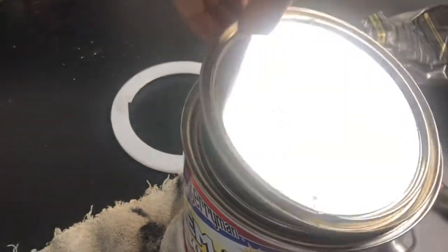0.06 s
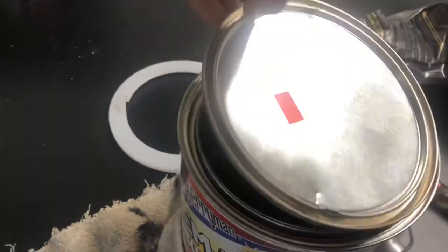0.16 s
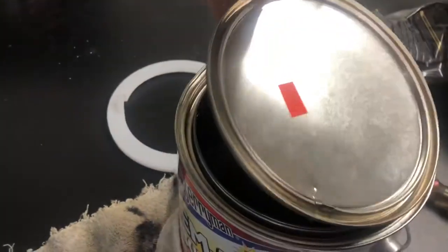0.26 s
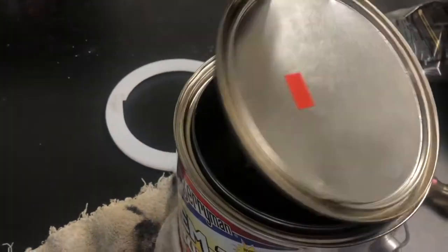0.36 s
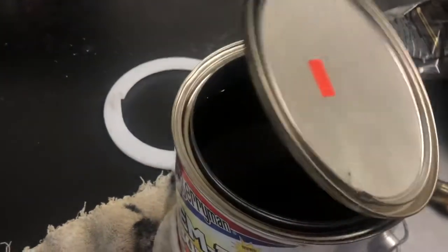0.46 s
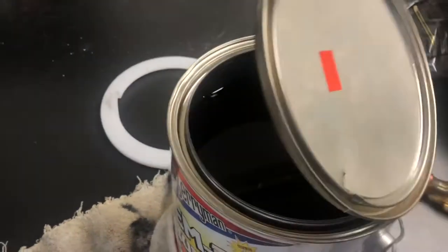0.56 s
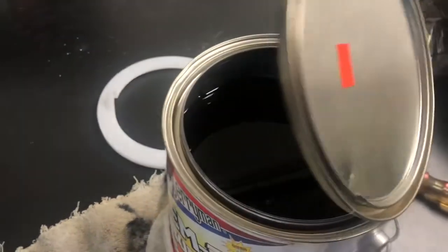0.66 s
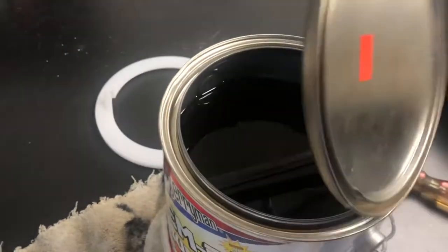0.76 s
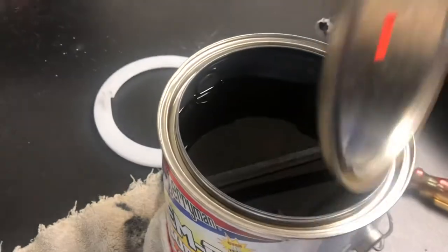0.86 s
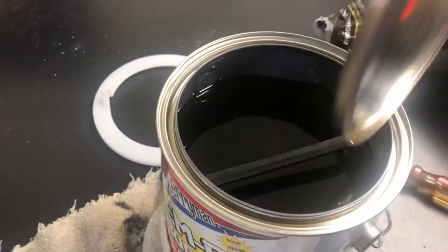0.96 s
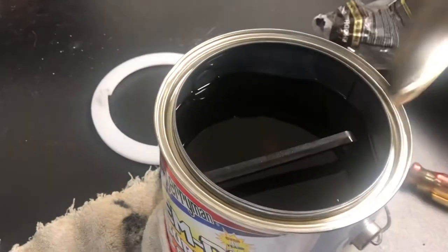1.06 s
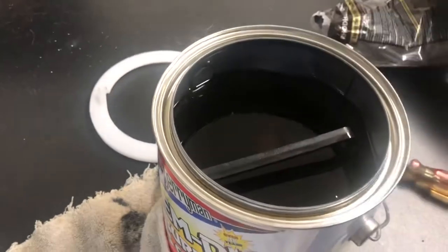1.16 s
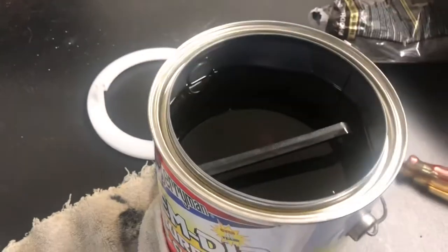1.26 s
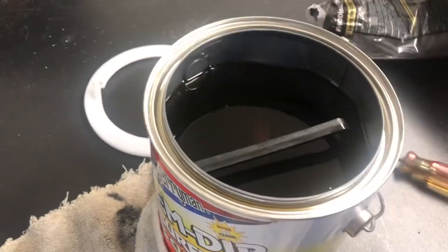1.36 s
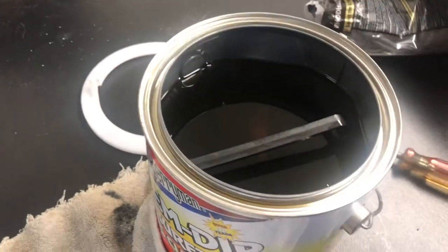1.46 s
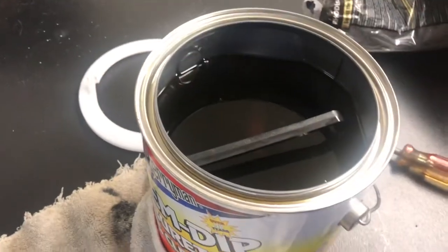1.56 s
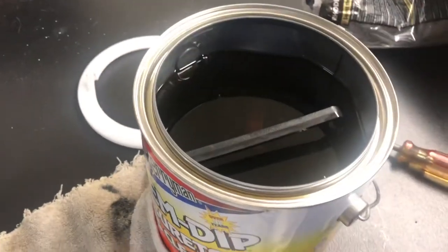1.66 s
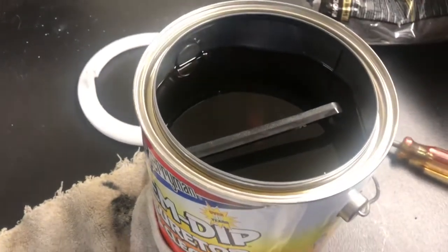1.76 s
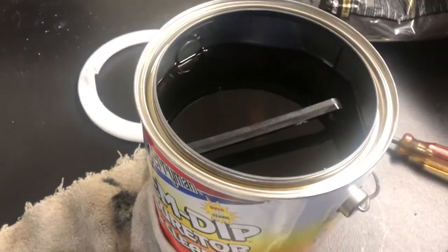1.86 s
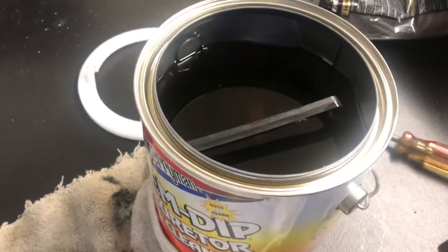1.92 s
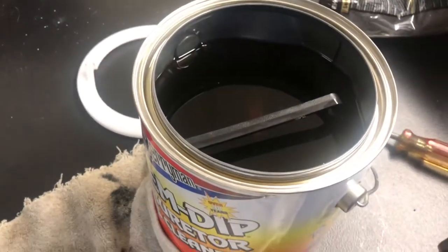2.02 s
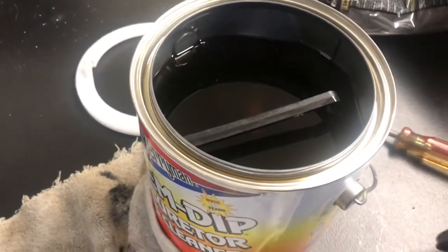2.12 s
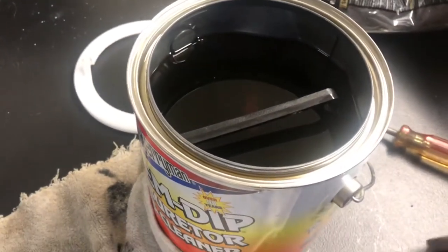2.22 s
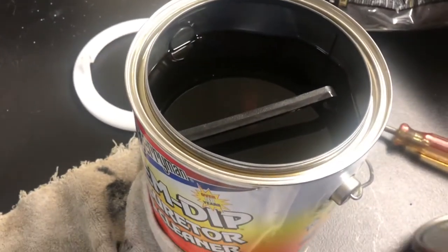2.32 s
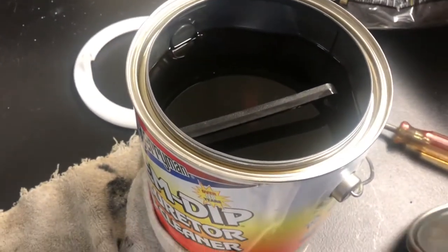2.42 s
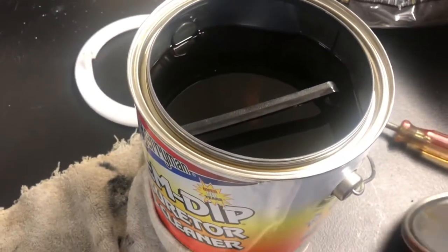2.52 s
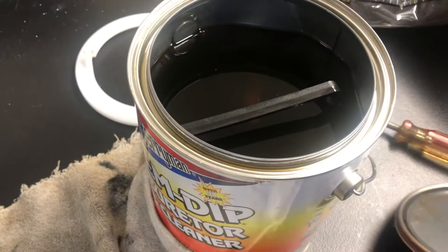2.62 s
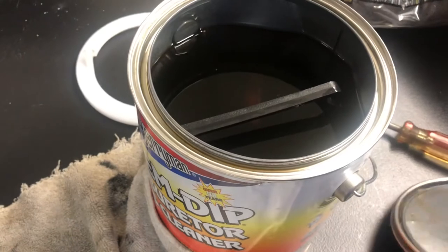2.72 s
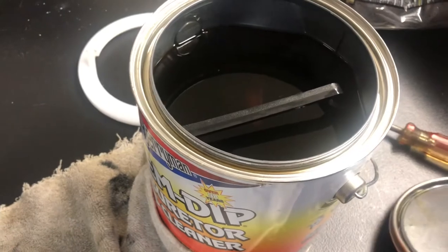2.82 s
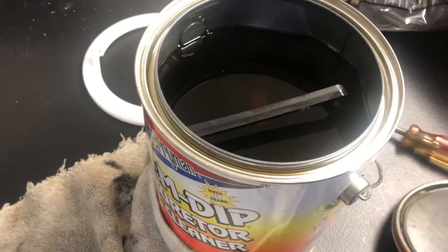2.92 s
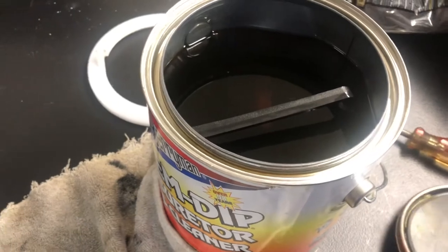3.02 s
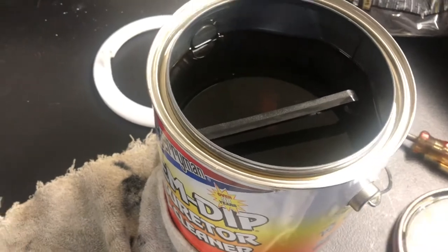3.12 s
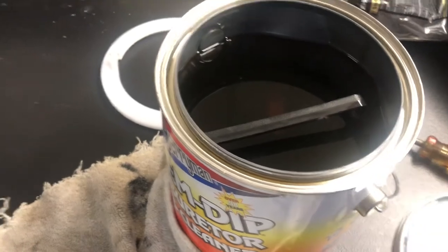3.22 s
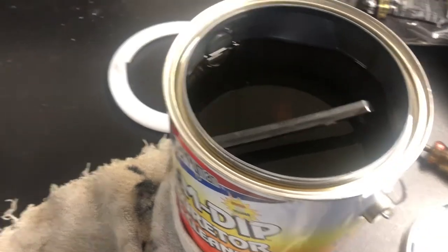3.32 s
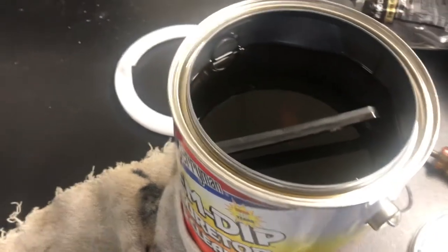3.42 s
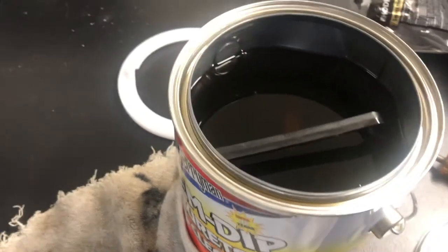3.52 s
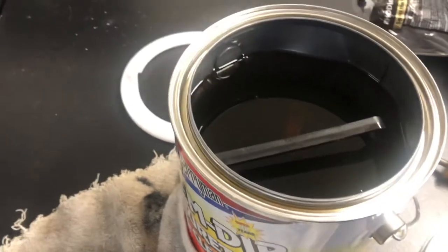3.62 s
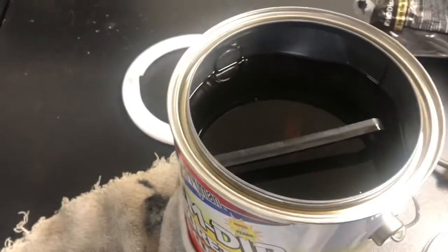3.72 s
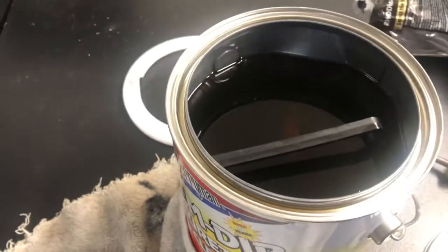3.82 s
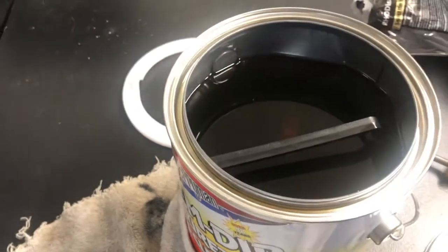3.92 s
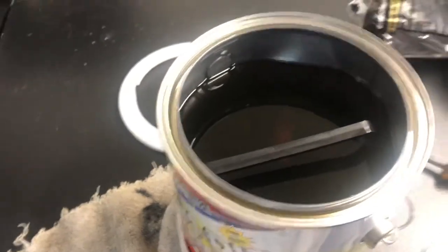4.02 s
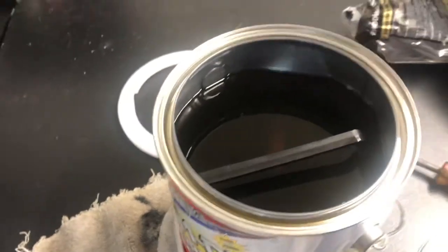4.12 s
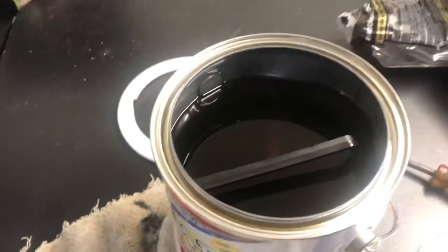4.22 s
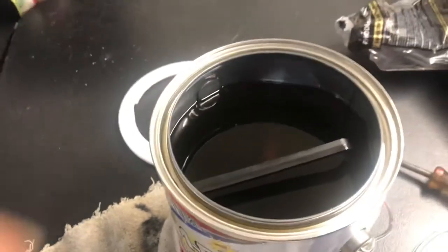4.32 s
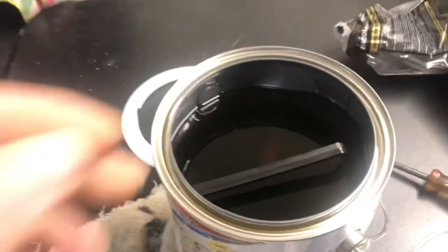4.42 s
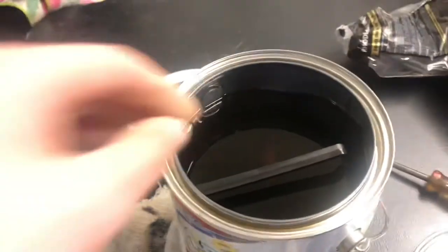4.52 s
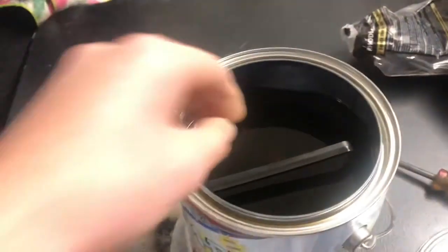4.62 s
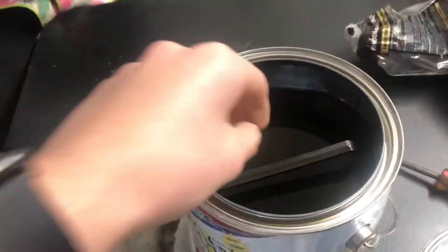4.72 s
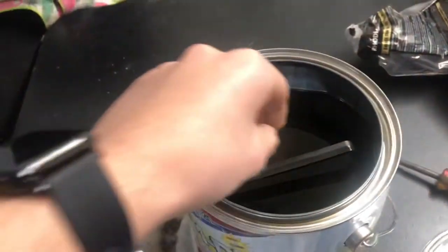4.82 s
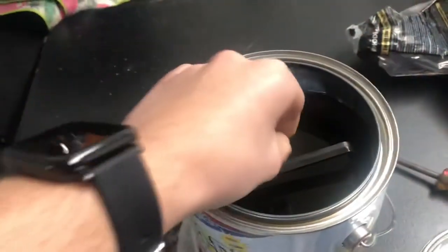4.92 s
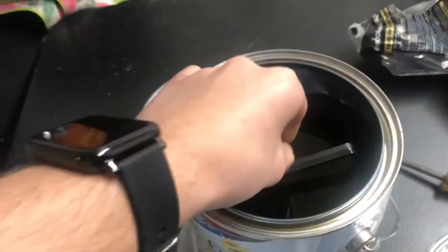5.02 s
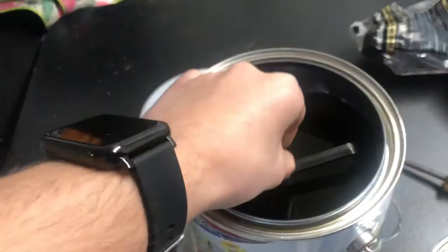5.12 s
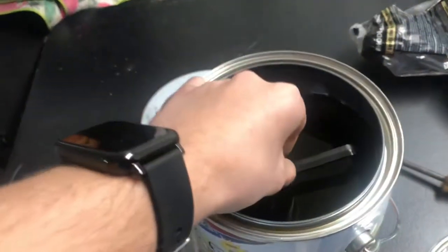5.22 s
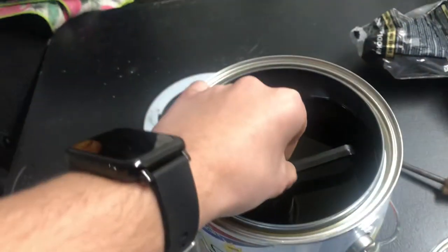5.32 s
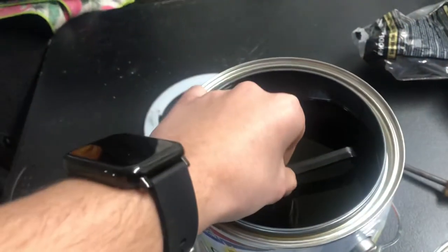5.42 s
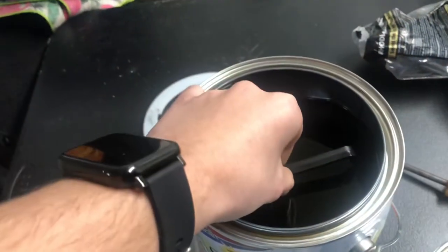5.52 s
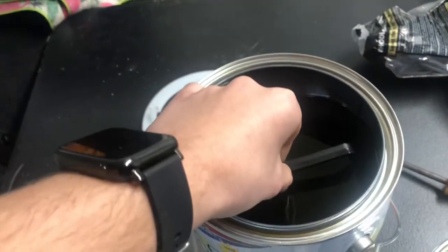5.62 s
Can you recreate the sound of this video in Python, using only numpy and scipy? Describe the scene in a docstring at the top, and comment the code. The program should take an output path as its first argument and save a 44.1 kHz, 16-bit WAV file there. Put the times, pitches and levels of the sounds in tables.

```python
"""First a faint scuff, then knocks, as a hand lifts the tin lid off a can in a quiet room.
The lid is set on a bench, slid along and let fall flat: blows and grit-like friction ring its decaying modes.
A few small taps follow through the bench top, as clicks with a downward-sweeping bending wave.
Last come a faint snap of noise clicks and soft pushes that hum in the bench.
One microphone takes it all in, over room hum and hiss made from banded noise."""
import sys
import numpy as np
from scipy import signal
from scipy.io import wavfile

SR = 44100
rng = np.random.default_rng(int(sys.argv[2]) if len(sys.argv) > 2 else 0)


def int16_out(signal):
    """Quantize to a 16-bit WAV file."""
    q = np.round(np.clip(np.atleast_2d(signal).T, -1, 1) * 32767)
    wavfile.write(sys.argv[1], SR, q.astype(np.int16))


N = 250047

# Room spectrum [f/Hz, level/dB per Hz]
ROOM_SPECTRUM = [(15, -53), (25, -24), (60, -2.5), (163, 0), (208, -3), (470, -11), (553, -15.5),
                 (726, -13.5), (787, -16), (1010, -18), (3060, -24.5), (15200, -31.5), (16500, -40.5)]
# Hum of the room, its low part, over time [t/s, level/dB]
ROOM_HUM = [(0, -61), (1.0, -67.5), (2.0, -69.5), (2.9, -65), (4.7, -70.5), (5.4, -66), (5.67, -69)]
# Soft pushes on the bench [t/s, length/s, level/dB]
NUDGES = [(5.04, 0.057, -71), (5.31, .14, -69), (5.533, 0.076, -74)]
# Faint snaps [t/s, level/dB]
SNAPS = [(5.249, -59.5), (5.255, -70), (5.269, -51)]
# Small taps; the sweep rate is larger from further off
# [t/s, click level/dB, click tilt/dB per octave, bench sweep level/dB, sweep rate/Hz s]
TAPS = [(3.792, -71, -5, -64, 1.2), (4.165, -54, 0.5, -71, 1.2), (4.182, -58, 1.1, -44, 2.4),
        (4.208, -40, -0.5, -40, 0.66), (4.219, -62, -3, -75, 1.2), (4.259, -43, -6.5, -44.5, 0.98),
        (4.273, -53, -8, -78, 1.2)]
# Bench top modes [f/Hz, relative level/dB, t60/s]
BENCH_MODES = [(70, -16, .3), (105, -11.5, 0.22), (151.6, -2.5, .15), (208, -1, 0.12), (278, -1, 0.083),
               (328, -3, 0.057), (391, -10, 0.18), (534, -15, 0.21)]
# Air modes of the open can under the lid [f/Hz, relative level/dB, t60/s]
CAN_AIR_MODES = [(348.5, -12, 0.13), (719, 2.5, 0.052), (782.5, -4, 0.062)]
# Lid modes, with levels for a knock in the hand, a flat fall and a rub
# [f/Hz, held level/dB, flat level/dB, rubbed level/dB, t60/s before damping]
LID_MODES = [(442.2, -18.5, -13.5, -16, .22), (542.4, -11, -14.5, -10.5, .22), (647, -6, -12, -8.5, .15),
             (739.4, 0, 1, -5.5, .17), (838.4, -7, -11, -13, 0.2), (919, -10, -14.5, -13.5, 0.44),
             (1003, -13.5, -22.5, -20, 0.35), (1098, -16.5, -15.5, -15, 0.33),
             (1175.5, -10.5, 1, -16.5, .2), (1228.5, -13.5, -4, -13.5, 0.33), (1255, -18.5, -5, -24, 0.28),
             (1592, -16.5, -16, -18, 0.29), (1920, -22.5, -15.5, -22.5, .35), (1986, -27, -3, -19, 0.32),
             (2024, -25.5, -1, -18, .3), (2175, -30, -16, -14, 0.38), (2280, -27.5, -12.5, -11, .4),
             (2358, -23, -16, -15, .45), (2460, -17.5, -17, -14, 0.088), (2523, -30, -19.5, -24, .5),
             (2660, -21.5, -18.5, -24, 0.19), (2780, -24, -13.5, -27.5, .35), (2973, -13, -15.5, -23, 0.2),
             (3052, -21, -7.5, -28, .24), (3330, -31, -18, -23, 0.41), (3453, -21.5, -7, -18.5, 0.17),
             (3555, -16, -5, -20.5, 0.22), (3904, -23.5, -13, -10, 0.2), (4445, -28, -13, -31, 0.18),
             (4650, -21, -18, -27, 0.2), (5360, -16.5, -19, -21.5, 0.044), (5950, -24, -24, -28, .2),
             (6300, -25.5, -20.5, -29, 0.13), (6780, -15, -13.5, -23.5, .1), (8670, -26, -16.5, -24, 0.13),
             (9850, -29, -23, -23, 0.08), (11300, -27, -32, -25.5, .08), (12900, -29.5, -29.5, -26.5, .08)]
# Spectrum of the many unresolved modes and the room [f/Hz, level/dB per Hz]
DENSE_SPECTRUM = [(120, -44), (200, -12), (529, -5.5), (590, -17), (735, -10), (1020, -13.5), (1210, -12.5),
                  (2610, -11.5), (3070, -10), (16000, -41.5)]
# Their decay [f/Hz, t60/s before damping]
DENSE_T60 = [(250, .32), (700, 0.29), (1500, 0.3), (2500, 0.2), (4000, .27), (7000, 0.23), (11000, .16),
             (15000, .14)]
# Spectrum of the contact crack, also used for clicks and hiss [f/Hz, level/dB per Hz]
CRACK_SPECTRUM = [(300, -13), (800, -7.5), (2000, 1.5), (5000, 0), (9000, -4.5), (16000, -11.5)]
# Spectrum of the rub on the bench [f/Hz, level/dB per Hz]
RUB_SPECTRUM = [(290, -34), (500, 0.5), (1000, -17.5), (2230, -19.5), (3110, -32), (3980, -24),
                (4730, -30.5), (16000, -30.5)]
# Short scuffs of the lid edge on rim and bench, the last a faint brush
# [t/s, length/s, ring level/dB, hiss level/dB, favoured f/Hz]
SCUFFS = [(0.01, 0.072, -82, -58.5, 3030), (0.148, 0.0679, -49, -55.5, 3250),
          (.255, 0.06, -55.5, -56, 2900), (0.401, 0.11, -38.5, -44.5, 4900), (0.791, 0.048, -44, -65, 3560),
          (.79, 0.093, -57.5, -76, 1060), (0.796, 0.024, -36, -57, 8000), (2.702, 0.02, -42.5, -70, 2340),
          (2.917, 0.018, -69, -71, 4000), (4.132, 0.087, -80, -65.5, 4990)]
# Slides of the lid along the bench, one list each [t/s, rub level/dB, bench level/dB]
SLIDES = [
    [(2.08, -56.5, -61), (2.138, -70.5, -39), (2.19, -67, -50.5), (2.24, -67.5, -44.5),
     (2.306, -50.5, -33.5), (2.36, -53, -34), (2.426, -60.5, -43.5), (2.5, -53.5, -39), (2.6, -53.5, -39),
     (2.734, -57, -46), (2.822, -71.5, -66), (2.9, -83.5, -63)],
    [(3.04, -92, -84), (3.088, -70, -68), (3.19, -56.5, -49)],
]
# Held lid knocks on the rim
# [t/s, ring level/dB, crack level/dB, thud level/dB, crack tilt/dB per octave, spot f/Hz, can wall level/dB]
KNOCKS = [(0.073, -48.5, -42.5, -41, 0.44, 920, -48.5), (.161, -50, -65, -48.5, 0, 3500, -66.5),
          (0.3291, -36.5, -29, -28, -2, 530, -49.5), (0.4462, -24.5, -23.5, -25.5, -2.5, 1200, -34.5),
          (0.5568, -31.5, -25, -31.5, -0.52, 3000, -48.5), (0.7188, -37.5, -29, -42, 1.7, 930, -60)]
# Lid pressed to the bench bumps on it
# [t/s, ring level/dB, crack level/dB, thud level/dB, crack tilt/dB per octave, spot f/Hz]
BUMPS = [(2.0581, -35.5, -25.5, -15, 1, 2000), (2.072, -40.5, -60, -29.5, -11.5, 530),
         (2.214, -76, -69.5, -35.5, -10.5, 530), (2.284, -61, -90, -25, -5, 530),
         (2.3058, -47, -42.5, -28.5, 5.1, 3960), (2.326, -54.5, -48, -31.5, 0.5, 530)]
# Lid let go clatters flat; columns as for the bumps
FALLS = [(3.1407, -51, -55.5, -47.5, -5, 1300), (3.17, -46.5, -51, -45, -6, 2470),
         (3.1911, -17.5, -5, -40.5, -2.5, 1973), (3.196, -22.5, -16, -28, -2.5, 930),
         (3.216, -17.5, -34.5, -31.5, 0, 3130)]

# How the lid lies when struck: (flatness: 0 takes the held levels, 1 the flat ones; decay factor;
# dense ringing over ring/dB; ring tilt per crack tilt; added ring tilt/dB per octave)
HELD = (0, 1.04, -17, 2, 1.5)
PRESSED = (.5, .5, -6, 0.67, -5)
FALLING = (1.1565, 1.0, -5.5, 1.8, -0.55)

EDGES = 25 * 2 ** np.arange(0, 9.6, .5)   # half-octave band edges, Hz
CENTRES = np.sqrt(EDGES[1:] * EDGES[:-1])

HISS_DB = -74.5
CUTOFF_HZ = 17000   # from here up the microphone signal is 80 dB down
RADIATION_HZ = 86   # lid and bench send out little below this
CAN_WALL_HZ, CAN_WALL_T60_S = 156, 0.45
CRACK_T60_S = .035
TICK_DB, TICK_T60_S = 5, 0.0023   # first contact, level over the crack
SPOT_DB, SPOT_FALL_DB = 7, 300   # the spot struck lifts modes near its pitch; fall per squared octave
THROUGH_CAN_DB = 1   # the bench under the can, over the can wall
SMALL_COUNT = 70   # small lid modes
REST_DB, REST_FADE_DB_PER_S, REST_HZ = -64, -3, 2500   # the edge rests on the rim and rubs faintly
LIFT_OFF_S = 0.94   # end of that rub
AIR_DB, WALL_HUM_DB = 8, -7   # can air and can wall, over the hiss level
UNCOVER_S, UNCOVER_DB_PER_S = 0.5, -33.5   # both fade as the lid swings off
SCUFF_FOCUS_DB = 14   # fall per squared octave from the favoured pitch
BENCH_HZ, BENCH_HZ_PER_S = 205, 200   # favoured bench pitch climbs along a slide
RUB_TILT_DB, RUB_TILT_DB_PER_S = 1, -4.5   # tilt per octave, dulling along a slide
SHIFT_DB = 3.5   # each lid mode swells and sinks under the rub
RUB_SMALL_DB, RUB_SMALL_DECAY, WANDER_DB = -19.5, .5, 8   # small lid modes under the rub
TAP_T60_S = 0.0062
SNAP_T60_S, SNAP_TILT_DB = 0.084, 0
PUFF_DB, PUFF_TILT_DB, PUFF_T60_S = -63.5, -8, 0.057   # dull puff that outlasts the click of every tap


def amp(db):
    """dB to gain."""
    return np.exp(np.asarray(db, float) * (np.log(10) / 20))


def rms_one(x):
    """Scale to rms 1."""
    return x / np.sqrt(np.mean(x ** 2) + 1e-20)


def at_hz(points, hz):
    """Read a table on a log-frequency axis."""
    table = np.array(points)
    return np.interp(np.log(hz), np.log(table[:, 0]), table[:, 1])


def near(hz, favoured_hz, fall_db):
    """Gain that falls with the squared distance in octaves from a favoured frequency."""
    return amp(-fall_db * np.log2(hz / favoured_hz) ** 2)


def drift(rate, size):
    """Slow random wander of rms 1, with `rate` new values a second."""
    count = int(size * rate // SR + 2)
    return rms_one(np.interp(np.arange(size) * rate / SR, np.arange(count), rng.standard_normal(count)))


def add(out, s, sound):
    """Mix a short sound in at time s."""
    i = round(s * SR)
    out[i:i + len(sound)] += sound[:len(out) - i]


def bands():
    """White noise split into half-octave bands; neighbours are unrelated."""
    white = rng.standard_normal((2, N))
    split = []
    for k, (lo, hi) in enumerate(zip(EDGES, EDGES[1:])):
        band = signal.butter(2, [lo, hi], "band", fs=SR, output="sos")
        split.append(signal.sosfilt(band, white[k % 2]))
    return np.array(split)


def weights(spectrum, tilt_db=0):
    """Band gains that bring a spectrum to rms 1, then tilt it about 2 kHz."""
    gain = amp(at_hz(spectrum, CENTRES))
    gain = gain / np.sqrt(np.sum(gain ** 2 * np.diff(EDGES) / (SR / 2)))
    return gain * amp(tilt_db * np.log2(CENTRES / 2000))


def dying(noise, s, gains, t60, length_s):
    """Noise bands, read from time s, that start at once and die with one t60 or one each."""
    i = round(s * SR)
    part = noise[:, i:i + round(length_s * SR)]
    t = np.arange(part.shape[1]) / SR
    return gains @ (part * amp(-60 * t / np.reshape(t60, (-1, 1))))


def ring(force, hz, t60):
    """Two-pole resonator: a unit click sets a sine of height 1 ringing."""
    r, w = amp(-60 / (t60 * SR)), 2 * np.pi * hz / SR
    return signal.lfilter([0, np.sin(w)], [1, -2 * r * np.cos(w), r * r], force + 1e-18)


def fed(noise, hz, gain, t60):
    """Noise into one mode; a unit drive gives rms 1."""
    return ring(gain * noise, hz, t60) * np.sqrt(4 * np.log(1000) / (t60 * SR))


def struck(hz, db, t60):
    """Sum of decaying modes after one click, signs alternating."""
    click = np.zeros(round(min(.6, 1.2 * max(t60)) * SR))
    click[0] = 1
    return sum((-1) ** k * amp(db[k]) * ring(click, hz[k], t60[k]) for k in range(len(hz)))


def grit(per_s, spread_db, size):
    """Dense uneven micro-contacts of metal on a hard surface; rms 1."""
    sizes = amp(spread_db * np.minimum(rng.exponential(1, size), 4))
    sizes = sizes * rng.choice([-1, 1], size)
    return rms_one(sizes * (rng.random(size) < per_s / SR))


def room(noise):
    """Low rumble of the room that wavers slowly, and steady hiss above it."""
    gains, low = weights(ROOM_SPECTRUM), CENTRES < 650
    s, hum_db = np.transpose(ROOM_HUM)
    hum_level = amp(np.interp(np.arange(N) / SR, s, hum_db))
    hum = hum_level * rms_one(gains[low] @ noise[low])
    return hum + amp(HISS_DB) * rms_one(gains[~low] @ noise[~low])


def nudges():
    """Soft pushes, as swells of noise force, set the bench modes humming faintly."""
    out = np.zeros(N)
    for s, length_s, level_db in NUDGES:
        push = np.append(np.hanning(round(length_s * SR)), np.zeros(SR // 5))
        push = push * rng.standard_normal(len(push))
        add(out, s, sum(fed(push, hz, amp(level_db + db), t60) for hz, db, t60 in BENCH_MODES))
    return out


def snaps(noise):
    """Faint snaps: dying noise clicks alone, with no bench wave."""
    out = np.zeros(N)
    gains = weights(CRACK_SPECTRUM, SNAP_TILT_DB)
    for s, db in SNAPS:
        add(out, s, amp(db) * dying(noise, s, gains, SNAP_T60_S, .1))
    return out


def taps(noise):
    """A click through the air and a bending wave through the bench: highs arrive first, so it sweeps down."""
    out, t = np.zeros(N), np.arange(round(0.058 * SR)) / SR
    puff_gains = weights(CRACK_SPECTRUM, PUFF_TILT_DB)
    for s, click_db, tilt_db, sweep_db, rate in TAPS:
        sweep_hz = 60 + rate / (t + 0.0006)
        envelope = np.minimum(t / 0.0021, 1) * amp(-60 * t / 0.086)
        sweep = np.sin(2 * np.pi * np.cumsum(sweep_hz) / SR) * envelope
        add(out, s, amp(click_db) * dying(noise, s, weights(CRACK_SPECTRUM, tilt_db), TAP_T60_S, .1))
        # read other noise, so that puff and click are unrelated
        add(out, s, amp(PUFF_DB) * dying(noise, s + .1, puff_gains, PUFF_T60_S, .1))
        add(out, s, amp(sweep_db) * sweep)
    return out


def friction(hiss, s, swell, ring_db, hiss_db, favoured_hz):
    """Friction at the lid edge rings in the held lid and, while the lid still covers it, in the can."""
    swell = np.append(swell, np.zeros(round(.3 * SR)))   # room to ring on
    drive = swell * grit(4000, 2.5, len(swell))
    t = s + np.arange(len(swell)) / SR
    can_db = hiss_db + UNCOVER_DB_PER_S * np.maximum(t - UNCOVER_S, 0)
    lid = sum(fed(drive, hz, amp(held_db + 4) * near(hz, favoured_hz, SCUFF_FOCUS_DB), 0.54 * t60)
              for hz, held_db, _, _, t60 in LID_MODES)
    air = sum(fed(drive, hz, amp(can_db + AIR_DB + db), t60) for hz, db, t60 in CAN_AIR_MODES)
    wall = fed(drive, CAN_WALL_HZ, amp(can_db + WALL_HUM_DB), CAN_WALL_T60_S)
    rush = amp(hiss_db) * swell * hiss[round(s * SR):][:len(swell)]
    return amp(ring_db) * lid + air + wall + rush


def scuffs(noise):
    """Short swells of friction, the early ones over a faint fading rub of the edge on the rim."""
    out, hiss = np.zeros(N), weights(CRACK_SPECTRUM, -1.9) @ noise
    for s, length_s, ring_db, hiss_db, favoured_hz in SCUFFS:
        swell = np.hanning(round(length_s * SR))
        add(out, s, friction(hiss, s, swell, ring_db, hiss_db, favoured_hz))
    t = np.arange(round(LIFT_OFF_S * SR)) / SR
    rest = amp(REST_FADE_DB_PER_S * t) * np.minimum((LIFT_OFF_S - t) / .1, 1)
    add(out, 0, friction(hiss[SR:], 0, rest, REST_DB, REST_DB, REST_HZ))
    return out


def small_modes():
    """The many small modes of the lid: pitches and t60, both scattered."""
    hz = np.linspace(1400, 15000, num=SMALL_COUNT) + rng.uniform(-90, 90, size=SMALL_COUNT)
    return hz, at_hz(DENSE_T60, hz) * amp(rng.normal(0, 1.0, size=SMALL_COUNT))


def slide(noise, small_hz, small_t60):
    """The lid dragged over the bench: grit feeds the damped lid, lumps the bench; mode levels wander."""
    out = np.zeros(N)
    for rows in SLIDES:
        s, *columns = np.transpose(rows)
        t = np.arange(s[0], s[-1] + .2, 1 / SR)   # 0.2 s to ring on
        moving = t < s[-1]
        rub_db, bench_db = [np.interp(t, s, c) for c in columns]
        favoured_hz = BENCH_HZ + BENCH_HZ_PER_S * (t - s[0])
        tilt_db = RUB_TILT_DB + RUB_TILT_DB_PER_S * (t - s[0])
        fine = moving * grit(4000, 4.0, len(t))
        lumps = moving * grit(500, 3.0, len(t))

        lid = np.zeros(len(t))
        for hz, _, _, db, t60 in LID_MODES:
            mode_db = rub_db + db + 3.5 + tilt_db * np.log2(hz / 2000) + SHIFT_DB * drift(15, len(t))
            lid += fed(fine, hz, amp(mode_db), 0.22 * t60)
        for hz, t60 in zip(small_hz, small_t60):
            mode_db = rub_db + RUB_SMALL_DB + at_hz(RUB_SPECTRUM, hz) - at_hz(RUB_SPECTRUM, 4000.)
            mode_db = mode_db + tilt_db * np.log2(hz / 2000) + WANDER_DB * drift(5, len(t))
            lid += fed(fine, hz, amp(mode_db), RUB_SMALL_DECAY * t60)
        bench = sum(fed(lumps, hz, amp(bench_db + db) * near(hz, favoured_hz, 11), 1.1 * t60)
                    for hz, db, t60 in BENCH_MODES)

        part = noise[:, round(s[0] * SR):][:, :len(t)]
        part = part * amp(np.outer(np.log2(CENTRES / 2000), tilt_db))
        hiss = moving * amp(rub_db - 3) * (weights(RUB_SPECTRUM) @ part)
        add(out, s[0], lid + bench + hiss)
    return out


def blows(noise, small_hz, small_t60):
    """Each blow rings the lid, thuds in can or bench, cracks, and leaves a dense tail of small modes and room."""
    out = np.zeros(N)
    hz, held_db, flat_db, _, t60 = np.transpose(LID_MODES)
    groups = ((KNOCKS, HELD, CAN_AIR_MODES), (BUMPS, PRESSED, BENCH_MODES), (FALLS, FALLING, BENCH_MODES))
    for table, lying, body in groups:
        flat, decay, dense_over_db, follows, brighter_db = lying
        # the point of contact varies from blow to blow
        spot = rng.normal(0, 1, (len(table), len(LID_MODES) + SMALL_COUNT))
        for (s, ring_db, crack_db, thud_db, tilt_db, spot_hz, *_), chance in zip(table, spot):
            ring_tilt_db = follows * tilt_db + brighter_db
            modes_db = (1 - flat) * held_db + flat * flat_db + ring_tilt_db * np.log2(hz / 1000)
            modes_db = modes_db + 1.3 * chance[:len(LID_MODES)] + SPOT_DB * near(hz, spot_hz, SPOT_FALL_DB)
            add(out, s, amp(ring_db) * struck(hz, modes_db, t60 * decay))
            add(out, s, amp(thud_db) * struck(*np.transpose(body)))

            # crack, tick and tail read the noise at different times, so they are unrelated
            crack_gains, tick_gains = weights(CRACK_SPECTRUM, tilt_db), weights(CRACK_SPECTRUM, tilt_db + 0.5)
            add(out, s, amp(crack_db) * dying(noise, s, crack_gains, CRACK_T60_S, .1))
            add(out, s, amp(crack_db + TICK_DB) * dying(noise, s + .2, tick_gains, TICK_T60_S, .02))

            dense_db = ring_db + dense_over_db
            small_db = at_hz(DENSE_SPECTRUM, small_hz) + tilt_db * np.log2(small_hz / 2000)
            small_db = small_db + 3.0 * chance[len(LID_MODES):]
            add(out, s, amp(dense_db + 3.0) * struck(small_hz, small_db, small_t60 * decay))
            tail_t60 = at_hz(DENSE_T60, CENTRES) * decay
            tail_gains = weights(DENSE_SPECTRUM, tilt_db)
            add(out, s, amp(dense_db) * dying(noise, s + .5, tail_gains, tail_t60, .6))
    # knocks on the rim also reach the can wall and, through the can, the bench
    for s, *_, wall_db in KNOCKS:
        add(out, s, amp(wall_db + THROUGH_CAN_DB) * struck(*np.transpose(BENCH_MODES)))
        add(out, s, struck(np.array([CAN_WALL_HZ]), [wall_db], np.array([CAN_WALL_T60_S])))
    return out


def scene():
    """All sources at one microphone; the lows of all but the room are cut."""
    noise, small = bands(), small_modes()
    things = nudges() + snaps(noise) + taps(noise)
    things = things + scuffs(noise) + slide(noise, *small) + blows(noise, *small)
    things = signal.sosfilt(signal.butter(4, RADIATION_HZ, "high", fs=SR, output="sos"), things)
    # shift the noise so that the room is unrelated to the handling sounds
    return (things + room(np.roll(noise, N // 3, axis=1)))[None]


def record(dry):
    """Peaks are rounded, the top is cut."""
    rounded = 1.1 * np.tanh(dry / 1.1)
    return signal.sosfilt(signal.cheby2(16, 80, CUTOFF_HZ, fs=SR, output="sos"), rounded)


dry = scene()
out = record(dry)
int16_out(out)
```